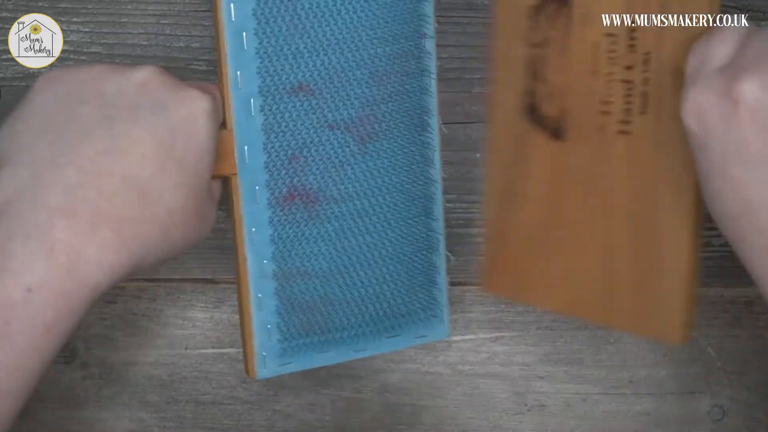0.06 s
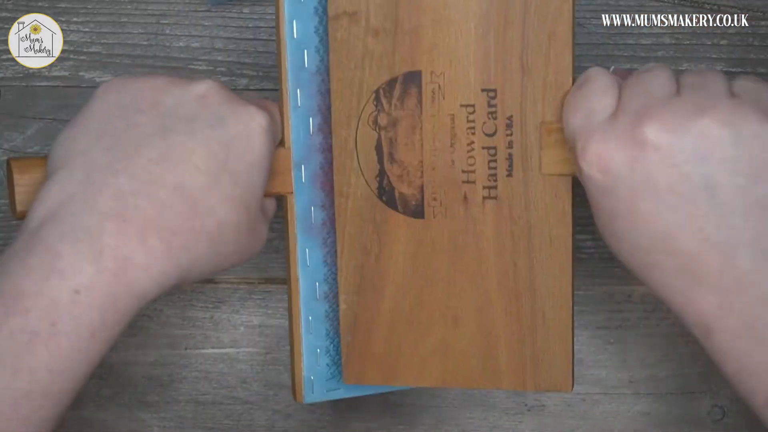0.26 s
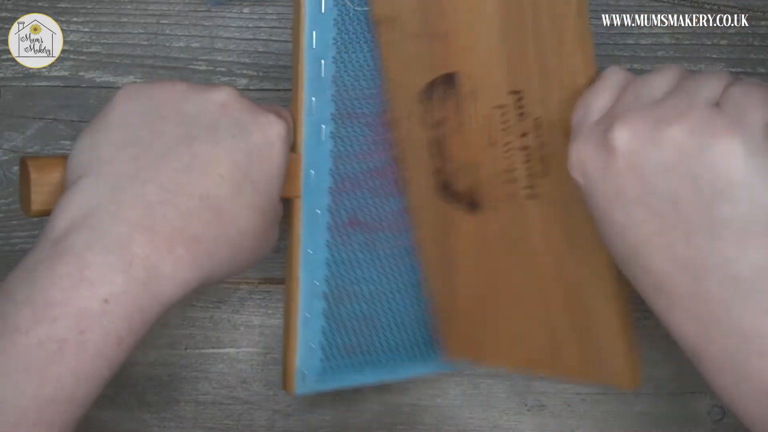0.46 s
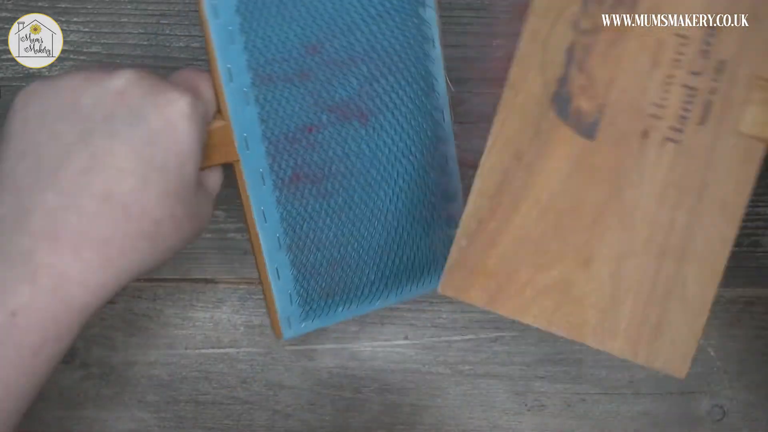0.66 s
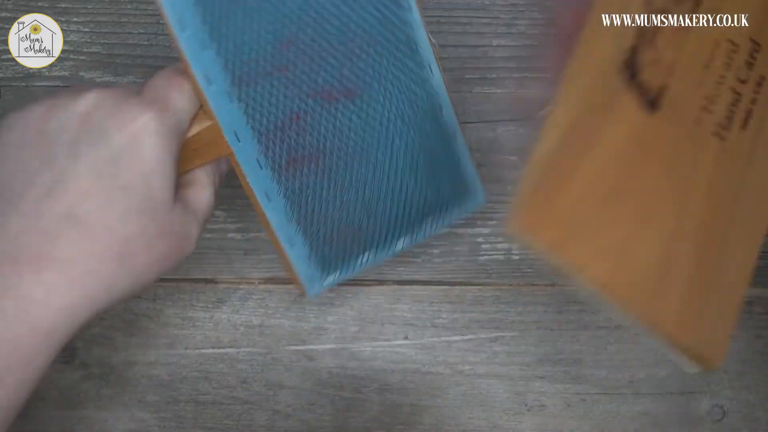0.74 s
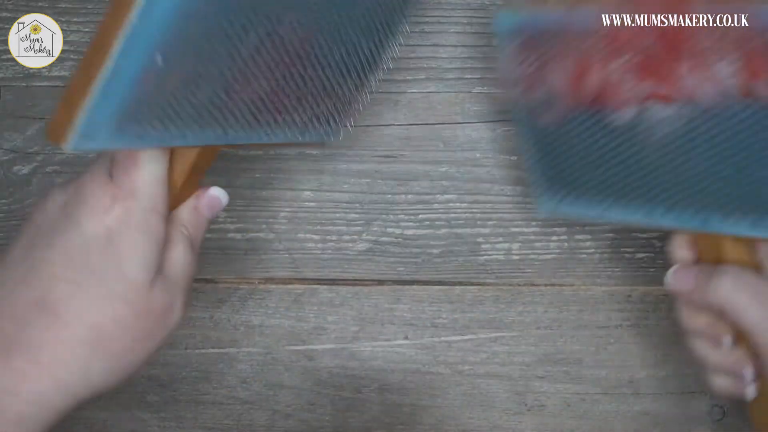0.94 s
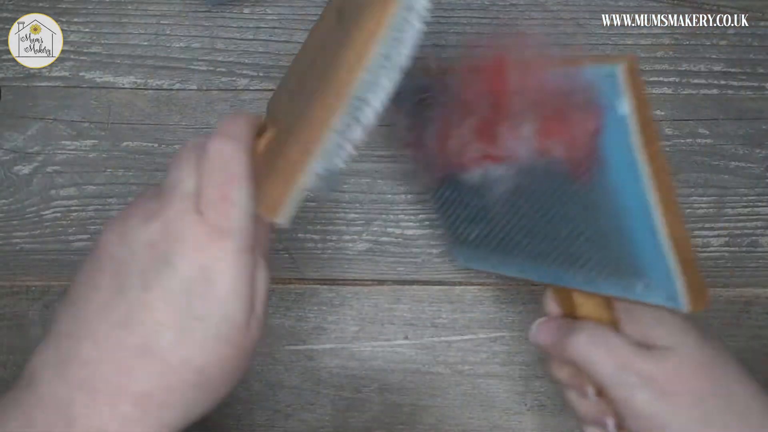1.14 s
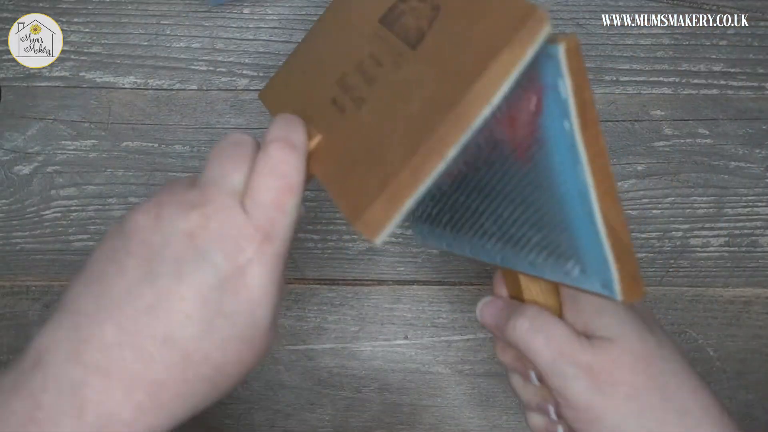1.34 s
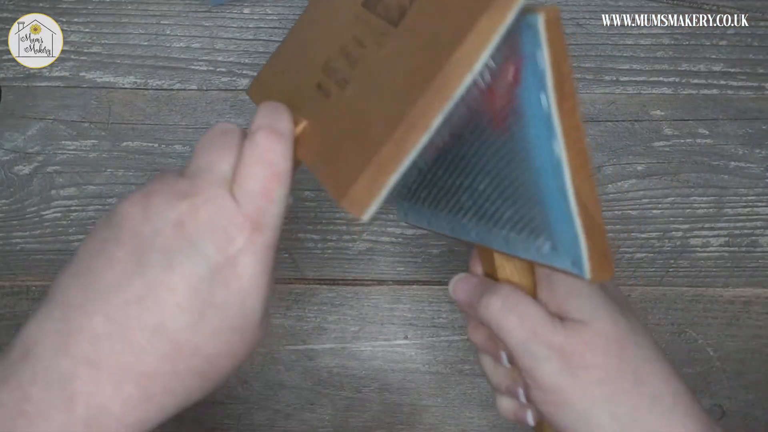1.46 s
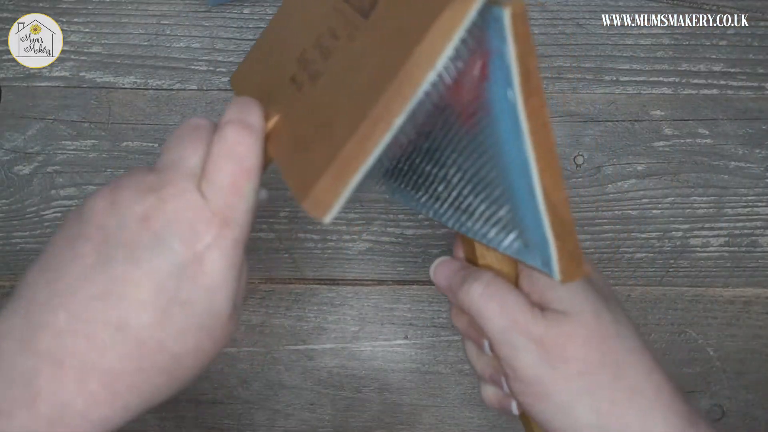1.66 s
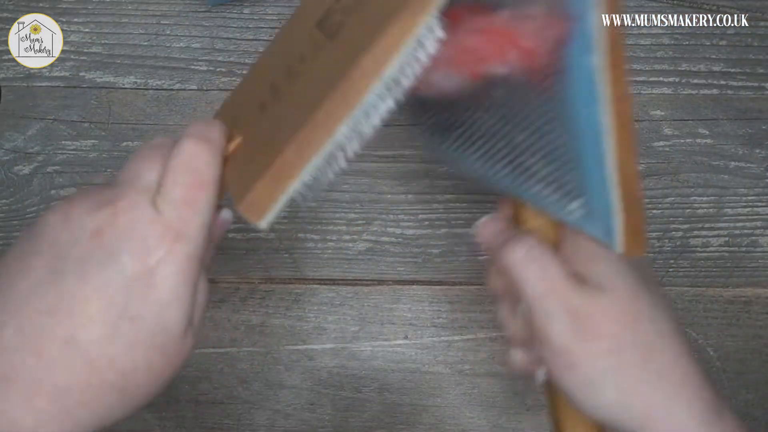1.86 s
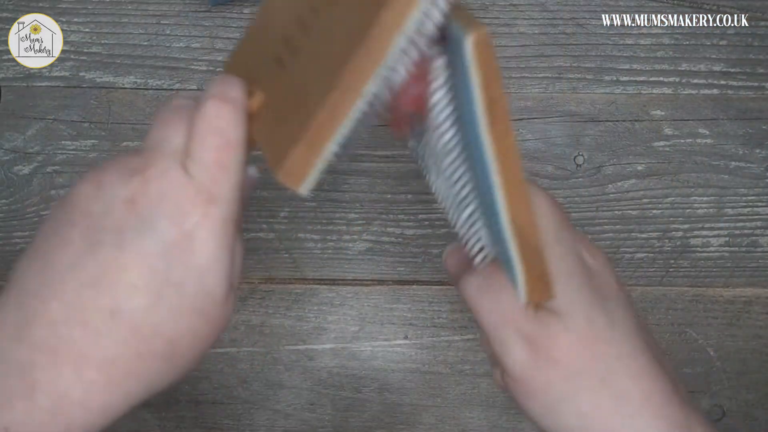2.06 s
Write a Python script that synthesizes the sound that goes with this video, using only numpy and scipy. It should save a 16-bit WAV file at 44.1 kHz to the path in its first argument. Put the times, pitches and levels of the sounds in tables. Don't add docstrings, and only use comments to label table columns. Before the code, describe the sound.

Scratchy combing of wool between two wooden wire-tooth paddles, close up in a small quiet room

```python
import sys
import numpy as np
from scipy import signal
from scipy.fft import rfft, irfft
from scipy.io import wavfile
from scipy.ndimage import uniform_filter1d

SR = 44100
rng = np.random.default_rng(int(sys.argv[2]) if len(sys.argv) > 2 else 0)


def wav_record(signal):
    frames = np.transpose(np.atleast_2d(signal))
    bounded = np.clip(frames, -1, 1)
    quanta = np.round(bounded * 32767).astype(np.int16)
    wavfile.write(sys.argv[1], SR, quanta)


def elevation(decibels):
    levels = np.asarray(decibels, float)
    return 10 ** (levels / 20)


N = 92610


def evened(x):
    return x / np.sqrt(np.mean(x ** 2) + 1e-20)


def read(points, hz):
    f, value = np.transpose(points)
    return np.interp(np.log(hz + 1), np.log(f + 1), value)


def curve(table, column):
    rows = np.array(table)
    return np.interp(np.arange(N) / SR, rows[:, 0], rows[:, column], -150, -150)


def add(mix, start, sound):
    part = mix[round(start * SR):][:len(sound)]
    part += sound[:len(part)]


def highpass(x, order, hz):
    return signal.sosfilt(signal.butter(order, hz, "high", fs=SR, output="sos"), x)


# pitch in Hz, level in dB, decay t60 in seconds.
PADDLE_MODES = [(328, -10, 0.021), (430, -16, 0.017), (537, -5, 0.02), (715, -5, 0.033), (968, -6, 0.016),
                (1149, -2.5, 0.022), (1460, 1, 0.0081), (1950, -6.5, 0.0097)]
# pitch in Hz, level in dB, decay t60 in seconds.
WIRE_MODES = [(2530, 4, 0.0039), (2800, 18, 0.00085), (3725, 8.5, 0.0039), (4500, -13, 0.0055),
              (5240, 3.5, 0.0044), (5910, -2, 0.0078), (6710, -6, 0.02), (7530, -7, 0.015),
              (9500, -29, .003), (11600, -16, 0.0046), (13440, -20, 0.0018)]


def ring(modes, size=2048):
    detune, colour_spread_db = 0.028, 2.5
    hz, db, t60 = np.transpose(modes)[:, :, None]
    t = np.arange(size) / SR
    pitch_chance, level_chance = rng.standard_normal((2, len(modes), 1))
    waves = np.sin(2 * np.pi * hz * (1 + detune * pitch_chance) * t)
    return (elevation(db + colour_spread_db * level_chance - 60 * t / t60) * waves).sum(0)


# time in seconds, drag level in dB, wire share in dB.
PULLS = [
    [(0, -63, 2.5), (.04, -73.5, -4), (.1, -95, -24)],
    [(.27, -72, -5), (.295, -62.5, -8.5), (.378, -50, -7), (.392, -48, 0.5), (.445, -44, 1.5),
     (.468, -48, 7.5), (.484, -41, 1), (.504, -63.5, -6.5), (.578, -76.5, -2.5)],
    [(1.797, -61, -38), (1.804, -41, -2.5), (1.83, -44.5, -1), (1.842, -49.5, -13), (1.868, -62.5, -22),
     (1.885, -70, -7), (1.95, -73.5, -14), (2.04, -75.5, -13)],
    [(2.04, -84, 2), (2.08, -71, -5), (2.1, -66, 9.5)],
]
# time in seconds, drag level in dB, wire share in dB.
SETTLE = [
    (.215, -74, 3),
    (.218, -46.5, -35),
    (.232, -43.5, -13),
    (.245, -66.5, -2),
    (.275, -57, -9.5),
]
# time in seconds, drag level in dB, wire share in dB.
CREEP = [(1.25, -83, -3), (1.284, -79.5, 6.5), (1.293, -49.5, -2.5), (1.32, -61.5, -3.5),
         (1.41, -58.5, -7.5), (1.48, -63.5, -5.5), (1.55, -59.5, -8.5), (1.6, -70.5, -29),
         (1.63, -63.5, -6), (1.72, -67, -5), (1.74, -68, -8), (1.789, -65.5, -2.5)]


def drag():
    slips_per_s, slip_spread_db, teeth = 3500, 1, 16
    strength = elevation(slip_spread_db * np.minimum(rng.exponential(1, N), 4))
    size = strength * (rng.random(N) < slips_per_s / SR)
    size = size / np.sqrt(uniform_filter1d(size ** 2, size=900) + 1e-9)
    size = size * rng.choice([-1, 1], N)
    tooth = rng.integers(0, teeth, N)
    strokes = [*PULLS, SETTLE, CREEP]
    paddle = sum(elevation(curve(p, 1)) for p in strokes)
    wire = sum(elevation(curve(p, 1) + curve(p, 2)) for p in strokes)
    out = np.zeros(N)
    for k in range(teeth):
        for gain, modes in ((paddle, PADDLE_MODES), (wire, WIRE_MODES)):
            tap = ring(modes)
            out += signal.oaconvolve(size * gain * (tooth == k), tap / np.linalg.norm(tap))[:N]
    return out


# start in seconds, peak in dB, wire pitch in Hz, paddle share in dB.
PEEL = [(1.293, -43.5, 3760, -1.5), (1.3063, -36, 4000, -37), (1.3434, -45.5, 3620, 10.5),
        (1.3478, -36, 3800, -24), (1.3634, -38.5, 3350, -6), (1.3769, -45, 2920, 6),
        (1.3878, -30.5, 3600, -14), (1.3949, -37, 5870, 0.5), (1.4094, -43.5, 2260, 8),
        (1.42, -55, 2170, -10), (1.4445, -44, 2430, 1), (1.4505, -44, 2260, -10), (1.4731, -36, 3160, 2.5),
        (1.497, -41.5, 4680, -5), (1.516, -38.5, 4600, -47), (1.5286, -50, 5260, 1),
        (1.5345, -41.5, 8460, -8), (1.5365, -39.5, 3560, 2), (1.5615, -50, 8300, -1),
        (1.57, -44.5, 2370, 6), (1.5804, -45.5, 3300, -23), (1.5962, -47.5, 2440, -39),
        (1.6166, -46, 2250, -7), (1.627, -45, 3300, 8), (1.6301, -37, 2260, 3), (1.6566, -37.5, 7670, -2),
        (1.6784, -40.5, 4370, 2), (1.6904, -49, 3400, -13), (1.7056, -49, 4270, 14)]
# start in seconds, peak in dB, wire pitch in Hz, paddle share in dB.
SNAGS = [(0.2172, -36, 2010, -23), (0.2205, -35.5, 2600, -31), (0.2232, -40, 1520, -10),
         (0.2608, -42, 3770, 6), (0.2645, -55, 1980, 10), (0.3952, -33, 2010, -19), (0.4098, -32, 3620, -1),
         (0.4125, -29, 1970, -1), (0.4212, -30, 2500, 5), (0.4347, -24.5, 3820, -9),
         (0.4385, -27.5, 2020, -6), (0.4457, -22.5, 3800, -17), (0.4515, -35, 3550, -17),
         (0.4631, -35, 3700, -32), (0.4675, -25.5, 3700, -9), (0.4775, -29.5, 3680, -10),
         (0.482, -28, 4060, 3.5), (0.7812, -43.5, 2340, -9), (0.7845, -43, 2900, -25),
         (1.7911, -43, 2440, 0), (1.8022, -37.5, 5640, -14), (1.8133, -30.5, 2470, -4),
         (1.8215, -35.5, 3740, -6), (1.8258, -32.5, 2540, -8), (1.8292, -30, 3880, 0),
         (1.8335, -31, 2450, -10), (1.847, -36, 3800, -26), (1.8515, -40, 3750, -15),
         (1.8605, -41, 3760, -18), (2.0888, -50.5, 4540, 14), (2.0974, -35, 3630, -0.5)]
# start in seconds, peak in dB, wire pitch in Hz.
TICKS = [(0.174, -61, 5650), (0.665, -56, 2600), (0.721, -60, 4050), (0.853, -58, 3850),
         (1.204, -64.5, 7000), (1.213, -59.5, 4000), (1.3, -38, 3960), (1.589, -47.5, 4800),
         (1.994, -65.5, 4900), (2.009, -61, 5550), (2.032, -70, 4750)]


def snag(start, peak_db, pitch_hz, paddle_db=-30):
    release_s, dull_db_per_octave = 0.0009, -4
    t = np.arange(300) / SR
    burst = rng.laplace(size=len(t)) * t * np.exp(-t / release_s)
    modes = [(hz, db + dull_db_per_octave * abs(np.log2(hz / pitch_hz)), t60) for hz, db, t60 in WIRE_MODES]
    modes.append((pitch_hz, 13, 0.005))
    wires = np.convolve(burst, ring(modes))
    knock = np.convolve(burst, ring(PADDLE_MODES))
    wires, knock = wires / abs(wires).max(), knock / abs(knock).max()
    return start, elevation(peak_db) * (wires + elevation(paddle_db - 6.5) * knock)


# time in seconds, boost in dB.
SING = [
    (.33, -17),
    (.39, 10.5),
    (.44, 7.5),
    (.465, 11),
    (.49, 8),
    (.52, -18),
    (1.79, -34),
    (1.81, 2),
    (1.87, -25),
]
# time in seconds, pitch in Hz, boost in dB.
BEND = [(.1, 594, -10), (.25, 500, -7), (.31, 730, 2), (.41, 740, -1), (0.443, 640, -9), (0.466, 1120, 5),
        (0.499, 830, -2.5), (1.6, 540, -8), (1.625, 1500, 4.5), (1.72, 1470, -5), (1.8, 1060, -5),
        (1.87, 1060, 5), (1.91, 950, -12)]


def resonate(x, hz, width_hz):
    turn = np.exp(2j * np.pi * np.cumsum(hz) / SR)
    r = np.exp(-np.pi * width_hz / SR)
    return 2 * (turn * signal.lfilter([1 - r], [1, -r], x / turn)).real


def sing(cards):
    return cards + elevation(curve(SING, 1)) * resonate(cards, np.full(N, 2010), width_hz=45)


def bend(cards):
    s, hz, db = np.transpose(BEND)
    t = np.arange(N) / SR
    grip_hz, boost_db = np.interp(t, s, hz), np.interp(t, s, db)
    once = resonate(cards, grip_hz, width_hz=400)
    return cards + elevation(boost_db) * resonate(once, grip_hz, width_hz=400)


# start in seconds, peak in dB, pitch in Hz, decay t60 in seconds.
KNOCKS = [(0.2591, -44, 990, 0.028), (.389, -37.5, 708, 0.043), (.3965, -35, 800, 0.023),
          (.403, -31.5, 723, 0.061), (.418, -30, 670, .03), (.432, -27, 606, 0.016),
          (0.4445, -18, 940, 0.016), (0.4679, -24, 1116, 0.03), (.4785, -23, 923, 0.021),
          (0.487, -28.5, 1273, 0.018), (1.4415, -43, 460, 0.014), (1.4505, -39, 810, 0.017),
          (1.5365, -35.5, 563, 0.015), (1.571, -43, 560, .02), (1.3075, -44.5, 720, .03),
          (1.626, -47, 1410, 0.064), (1.631, -40, 524, .02), (1.706, -47, 1395, 0.065),
          (1.8125, -38, 565, 0.021), (1.814, -29, 1410, 0.019), (1.8235, -38, 940, 0.032),
          (1.834, -38, 1040, 0.018), (1.856, -44, 940, .03), (1.8631, -36, 1095, 0.018)]
# start in seconds, peak in dB, pitch in Hz, decay t60 in seconds.
BUMPS = [
    (.157, -46, 111, 0.038),
    (0.2294, -28.5, 430, 0.023),
    (0.235, -30.5, 134, 0.028),
    (1.298, -39, 96, 0.029),
    (1.308, -32, 418, 0.014),
    (0.264, -42, 169, 0.036),
    (0.381, -49, 151, 0.062),
    (1.811, -42, 156, 0.032),
    (1.991, -48, 133, 0.034),
]


def bump(start, peak_db, hz, t60):
    t = np.arange(0, 0.15, 1 / SR)
    attack = np.minimum(t / 0.0021, 1)
    return start, elevation(peak_db - 60 * t / t60) * attack * np.sin(2 * np.pi * hz * t * (1 - 3 * t))


def shaped_noise(spectrum, patchy_db):
    frames, hz = N // 256 + 5, np.fft.rfftfreq(1024, 1 / SR)
    a, b, patches = rng.standard_normal((frames, 513, 3)).T
    patches = uniform_filter1d(patches, size=14, axis=0)
    patches = evened(uniform_filter1d(patches, size=5, axis=1))
    patchiness = patchy_db * (hz / (hz + 500))[:, None]
    level_db = read(spectrum, hz)[:, None] + patchiness * patches
    return evened(signal.istft((a + 1j * b) * elevation(level_db), nperseg=1024, noverlap=768)[1][:N])


# time in seconds, level in dB.
RUSTLE = [
    (.62, -120),
    (.7, -76),
    (.775, -76),
    (.79, -72),
    (.885, -73),
    (.9, -75.5),
    (1.04, -84.5),
    (1.09, -79),
    (1.27, -85),
]
# frequency in Hz, density in dB per Hz.
WOOL = [(300, -18), (900, -10), (2200, -6), (2700, 1), (3300, -6), (8000, -10), (15500, -15)]


def rustle():
    return elevation(curve(RUSTLE, 1)) * shaped_noise(WOOL, patchy_db=3.5)


# frequency in Hz, decay t60 in seconds.
ROOM_T60 = [(300, 0.1), (1500, 0.11), (8000, 0.12)]


def room(x):
    hz, t, z = signal.stft(rng.standard_normal((2, SR // 2)), SR, nperseg=256)
    tail = signal.istft(z * elevation(-60 * t / read(ROOM_T60, hz)[:, None]), SR, nperseg=256)[1]
    tail = np.pad(tail / np.linalg.norm(tail[0]), ((0, 0), (200, 0)))
    return signal.fftconvolve(x[None], tail, axes=1)[:, :N]


# frequency in Hz, density in dB per Hz.
HISS = [(20, -16.5), (45, -1), (110, -15), (270, -11.5), (420, -22.5), (1700, -32.5), (9000, -40.5),
        (11900, -42.5)]
HISS_TOP_HZ = 11800


def hiss():
    return elevation(-69.5) * shaped_noise([*HISS, (HISS_TOP_HZ, -80)], patchy_db=1.2)


# frequency in Hz, side level in dB.
WIDTH = [(60, -32), (300, -37), (2000, -35), (8000, -24.5), (13000, -29)]


def stereo(mid, wide):
    width = elevation(read(WIDTH, np.fft.rfftfreq(N, 1 / SR)))
    side = irfft(rfft(wide + np.roll(mid, 7)) * width, N)
    return np.array([mid + side, mid - side])


def scene():
    cards = drag()
    for row in [*PEEL, *SNAGS, *TICKS]:
        add(cards, *snag(*row))
    cards = highpass(bend(sing(cards)), 4, 271)
    for row in KNOCKS:
        add(cards, *bump(*row))
    wet, wide = room(cards)
    for row in BUMPS:
        add(cards, *bump(*row))
    cards = highpass(cards, 2, 55)
    mid = cards + elevation(-11) * wet + rustle() + hiss()
    return stereo(mid, wide)


def roll_off(x):
    return signal.sosfilt(signal.butter(12, 16410, fs=SR, output="sos"), x)


def record(dry):
    low = signal.oaconvolve(dry, signal.firwin(255, HISS_TOP_HZ, fs=SR)[None], "same")
    treble = dry - low
    treble_db = 10 * np.log10(abs(uniform_filter1d(treble[0] ** 2, size=1024)) + 1e-20)
    gate = uniform_filter1d(1. * (treble_db > -83.5), size=256)
    edge = signal.firwin(511, 15650, window=("kaiser", 9), fs=SR)
    finished = signal.oaconvolve(low + treble * gate, edge[None], "same")
    return roll_off(finished)


dry = scene()
out = record(dry)
wav_record(out)
```